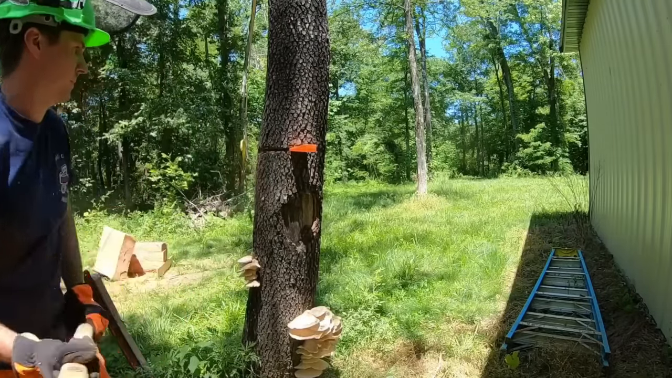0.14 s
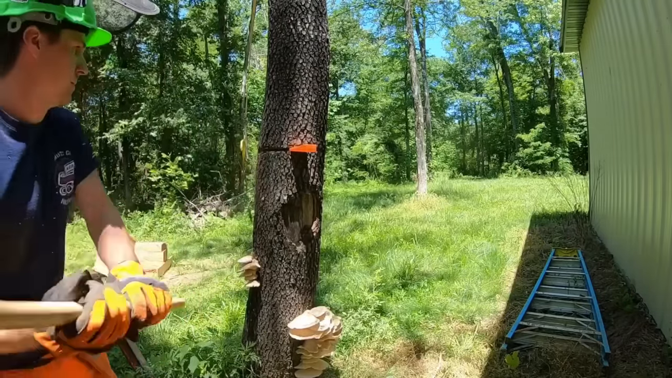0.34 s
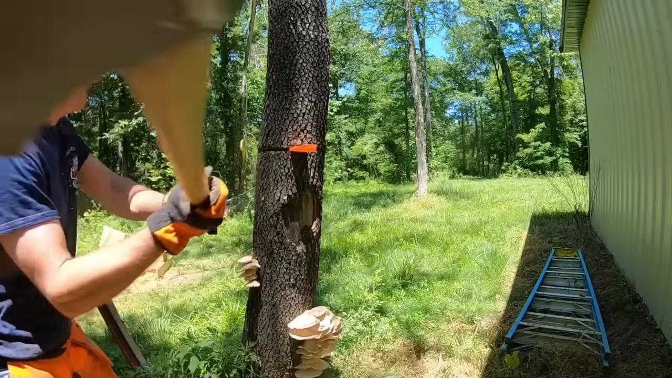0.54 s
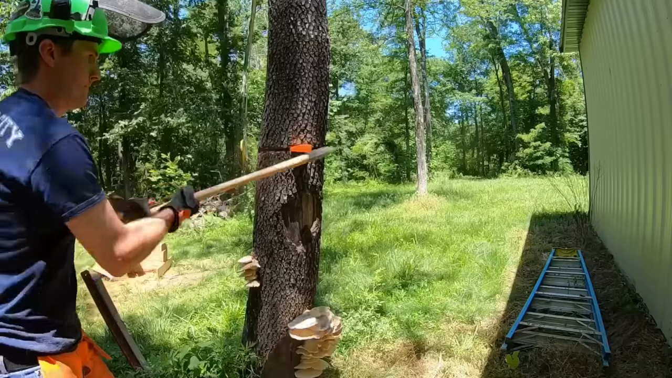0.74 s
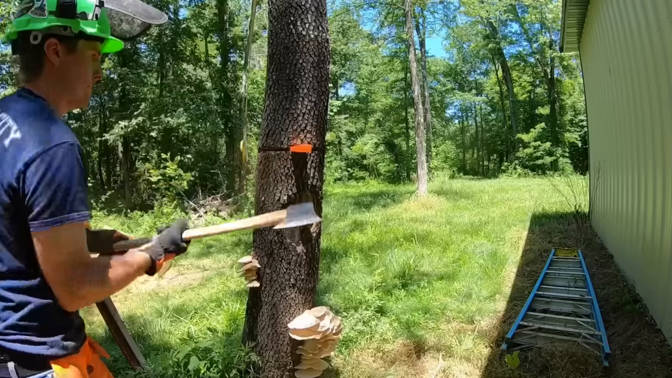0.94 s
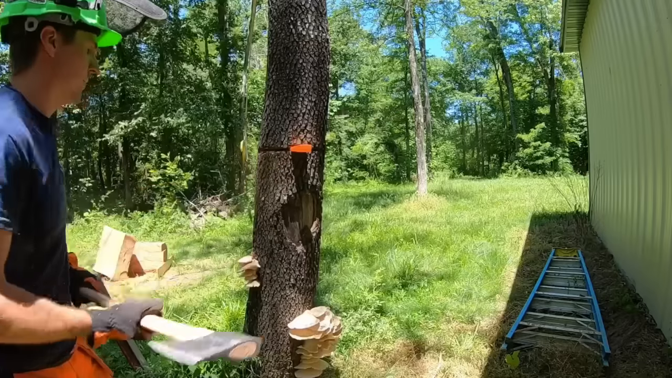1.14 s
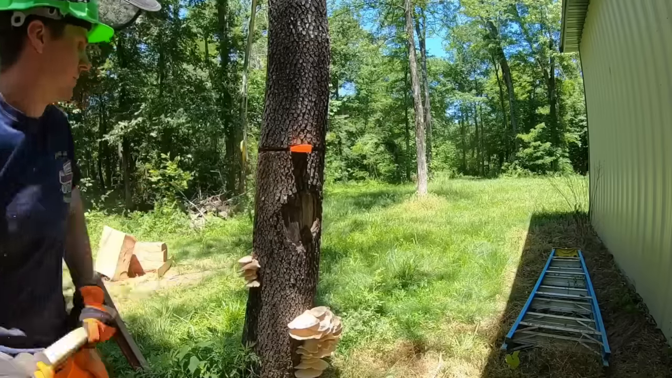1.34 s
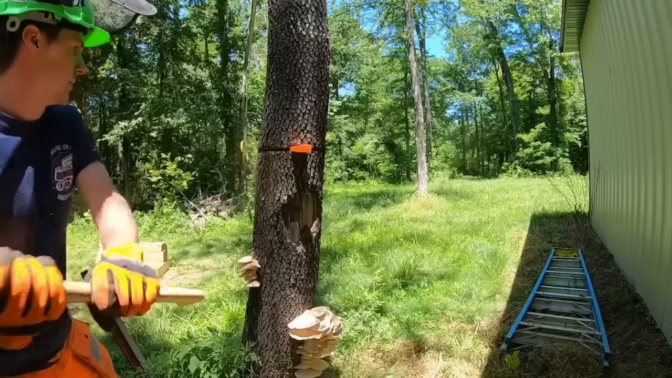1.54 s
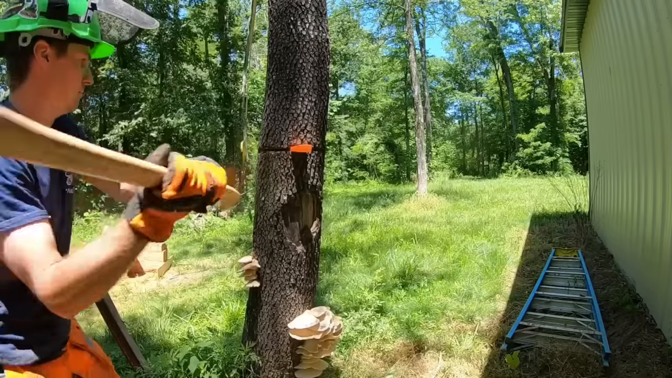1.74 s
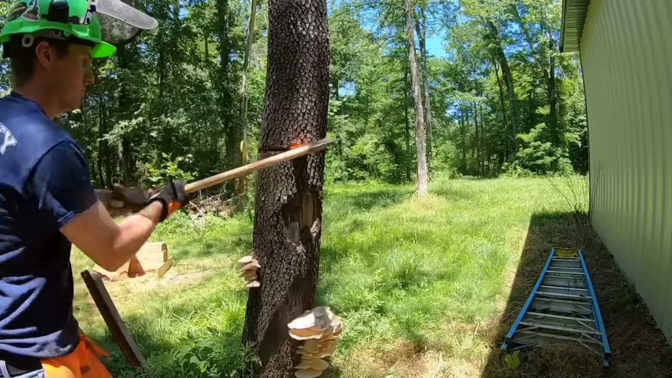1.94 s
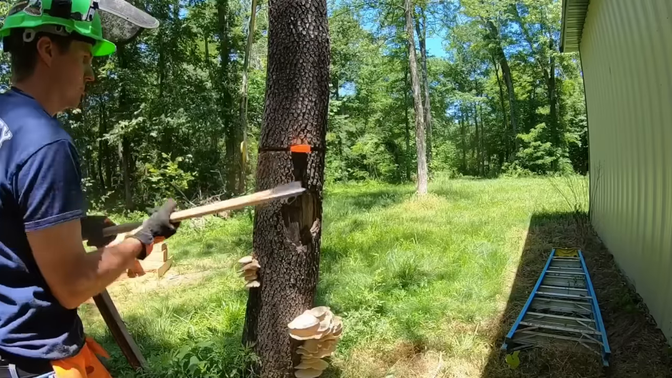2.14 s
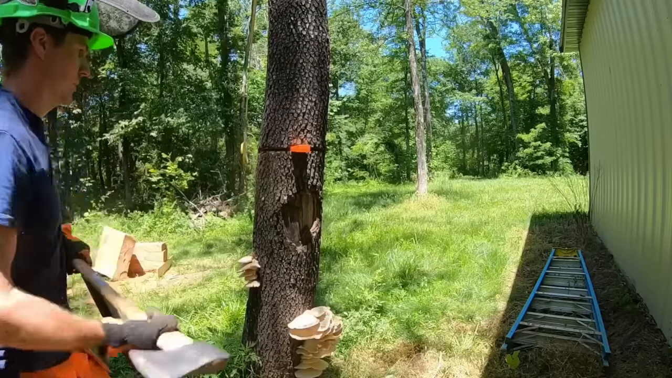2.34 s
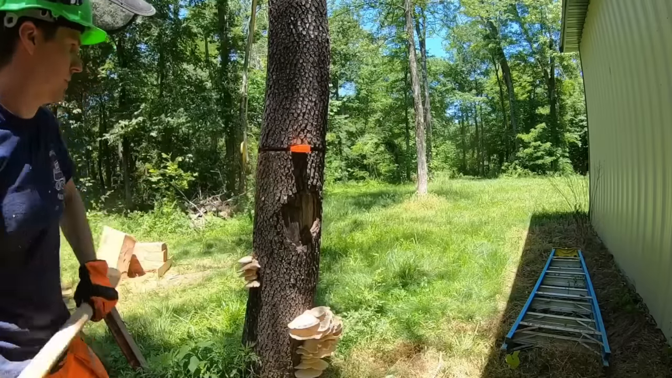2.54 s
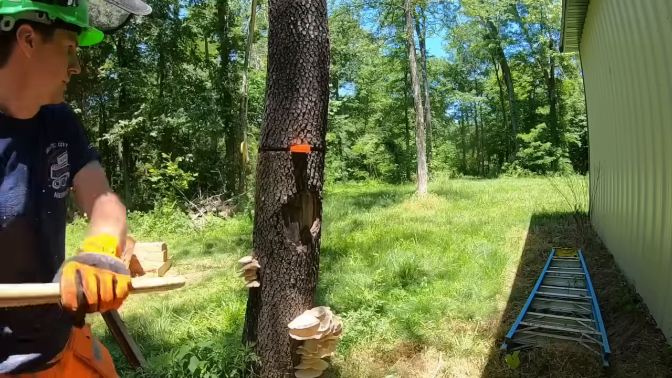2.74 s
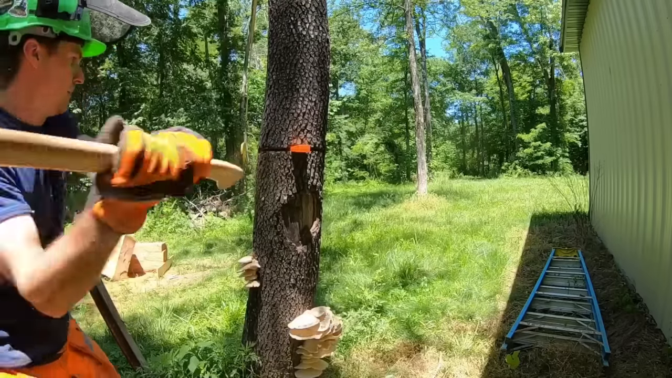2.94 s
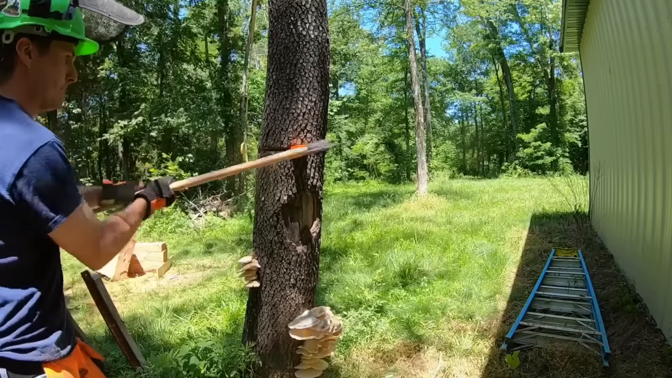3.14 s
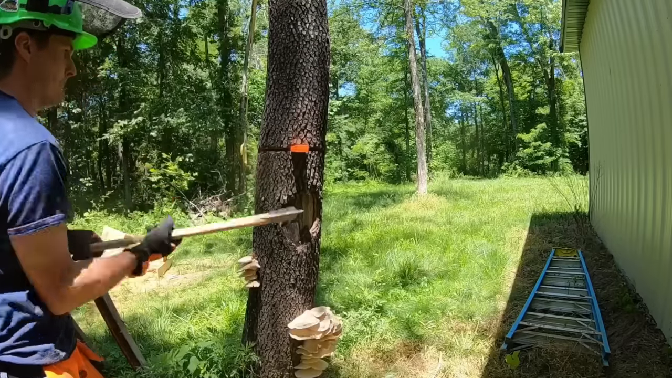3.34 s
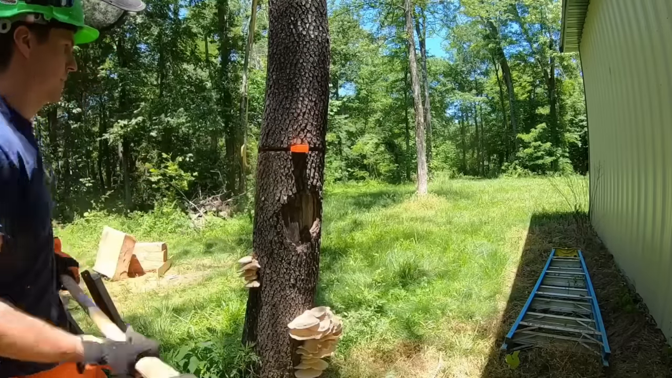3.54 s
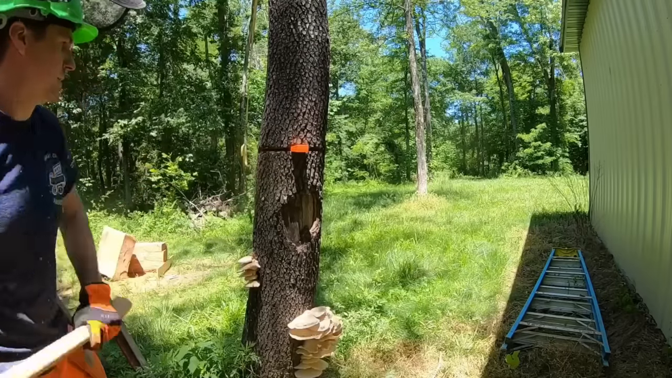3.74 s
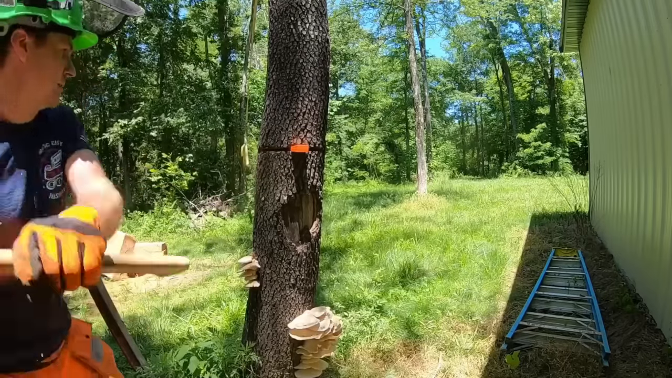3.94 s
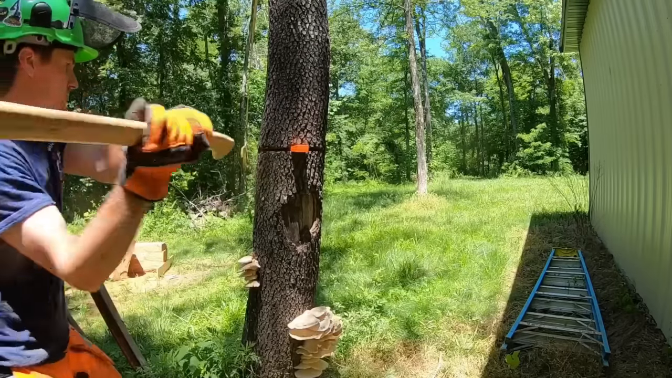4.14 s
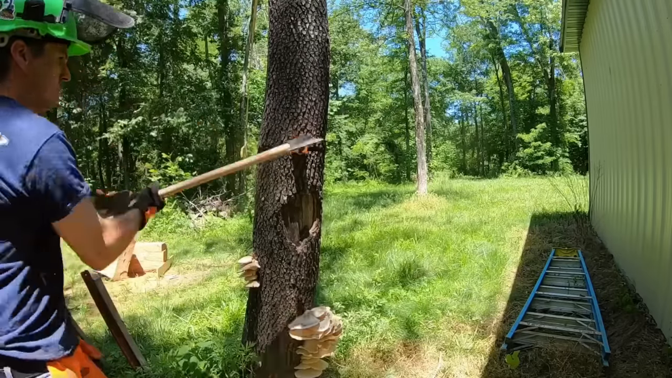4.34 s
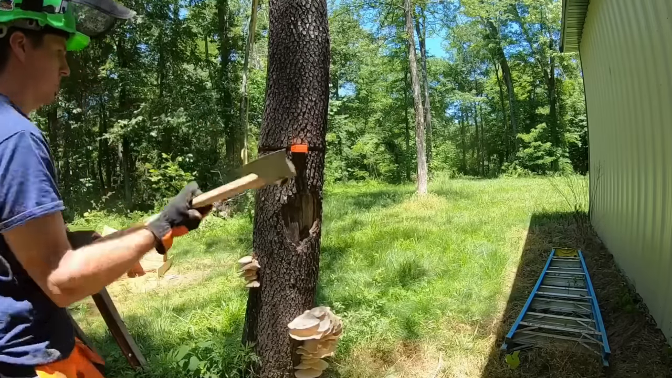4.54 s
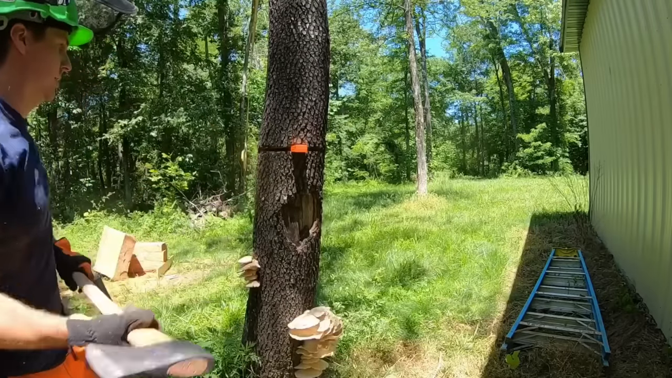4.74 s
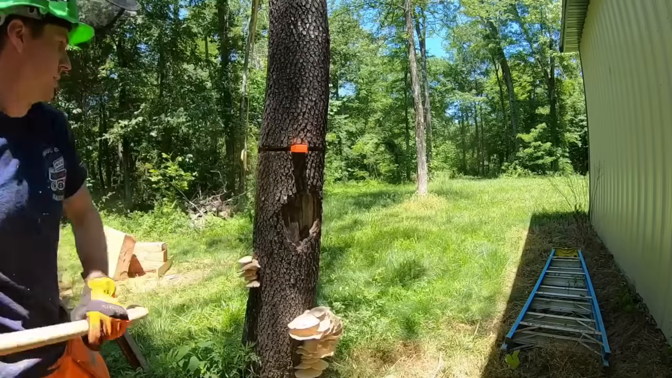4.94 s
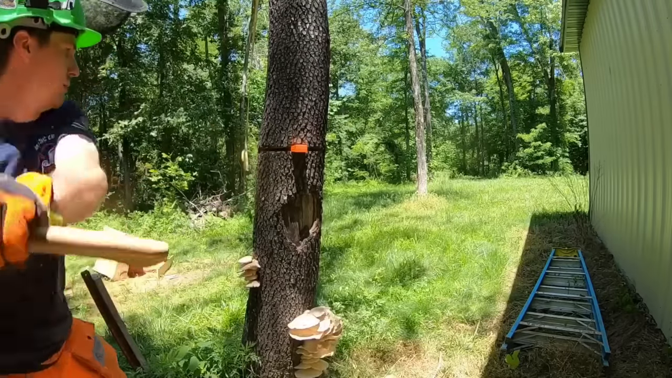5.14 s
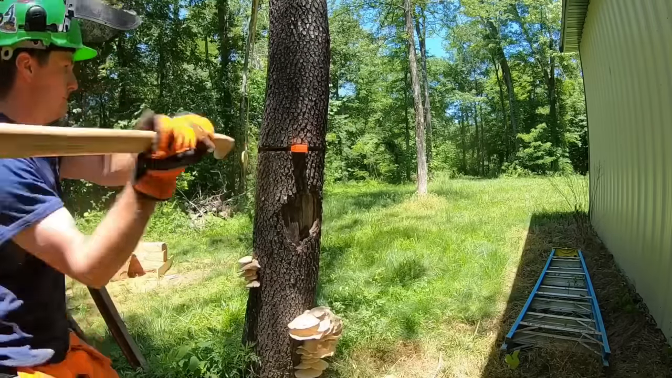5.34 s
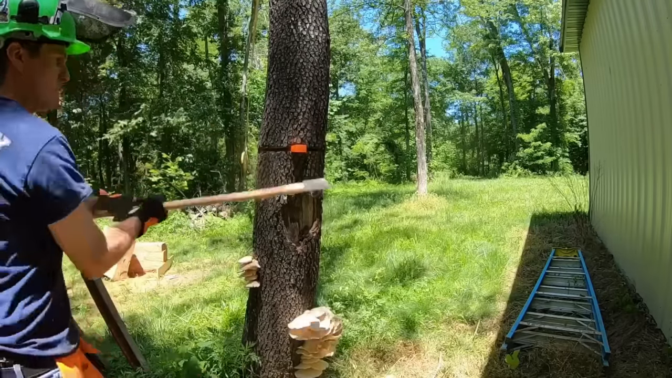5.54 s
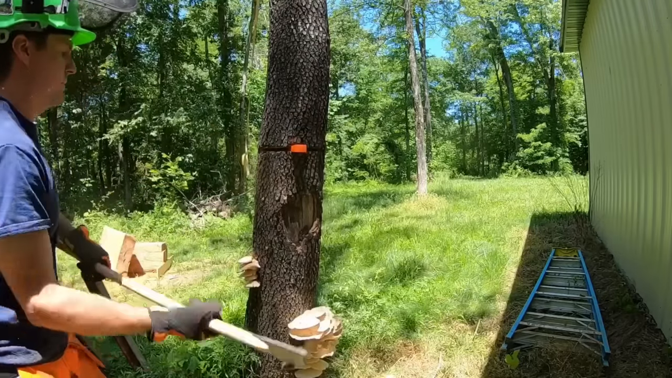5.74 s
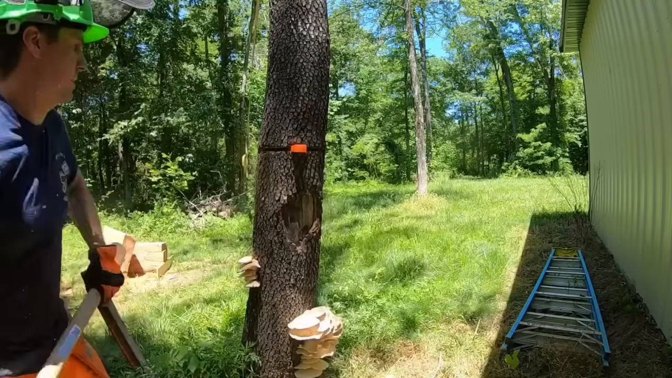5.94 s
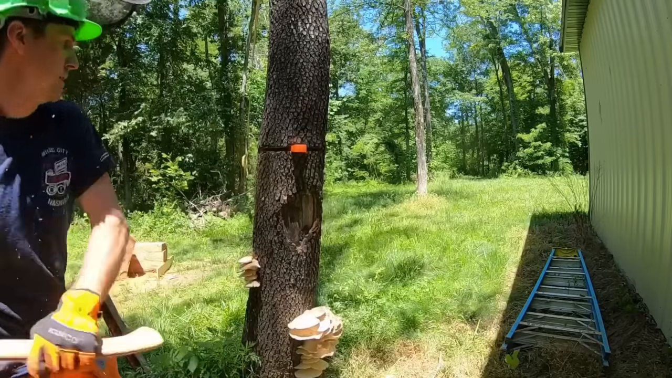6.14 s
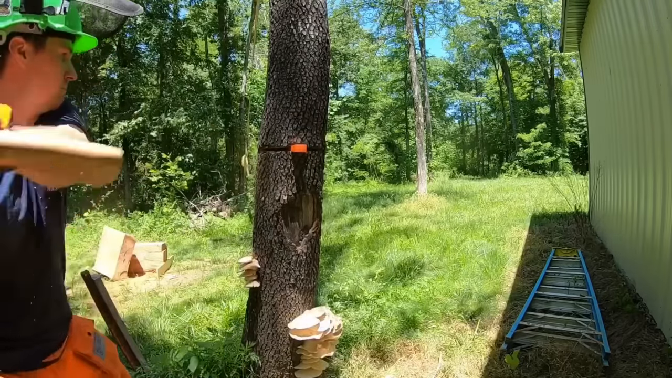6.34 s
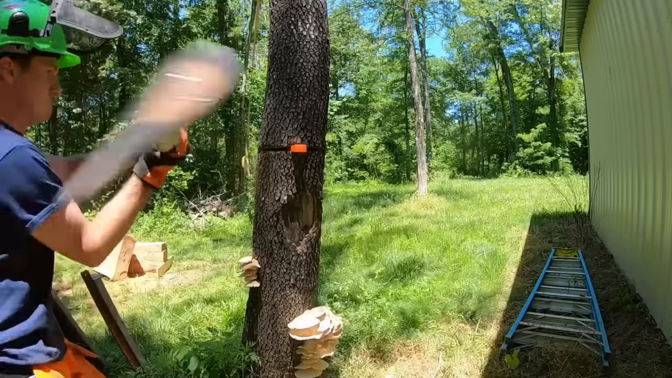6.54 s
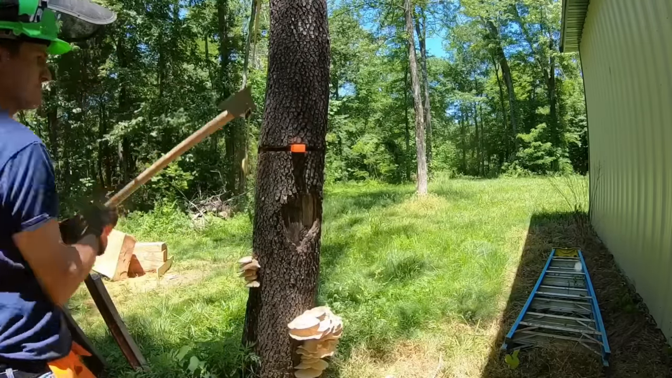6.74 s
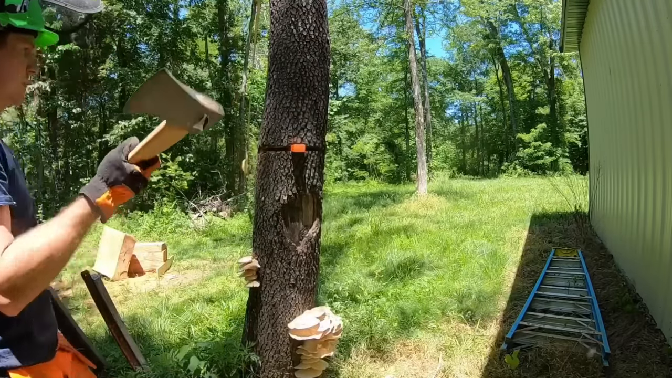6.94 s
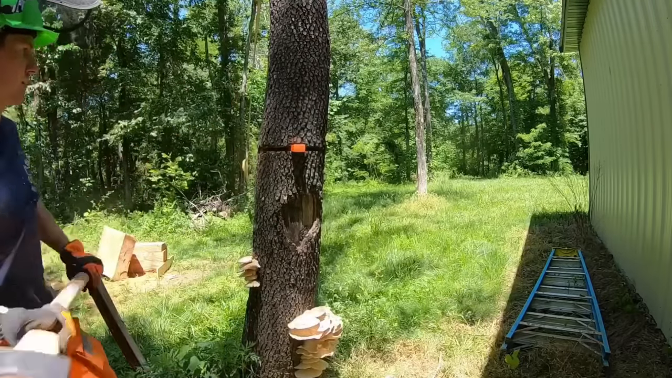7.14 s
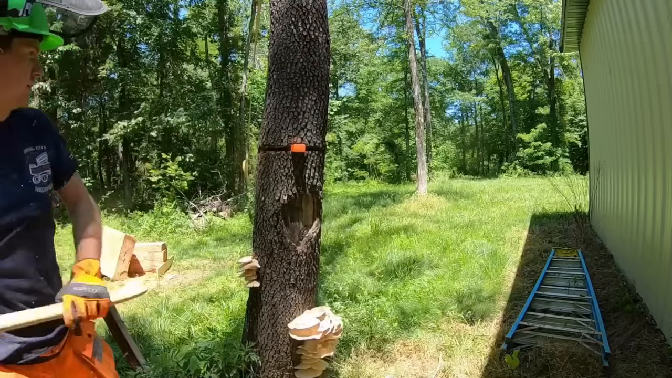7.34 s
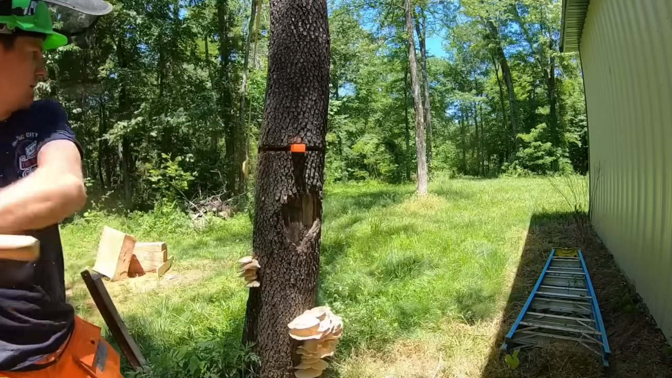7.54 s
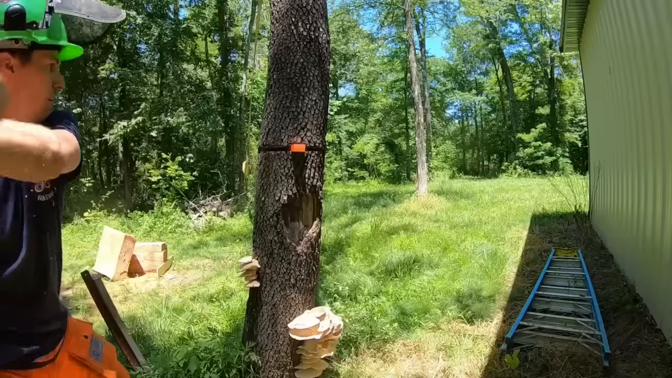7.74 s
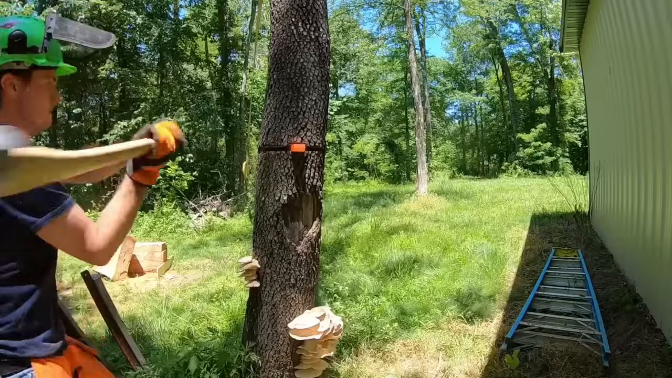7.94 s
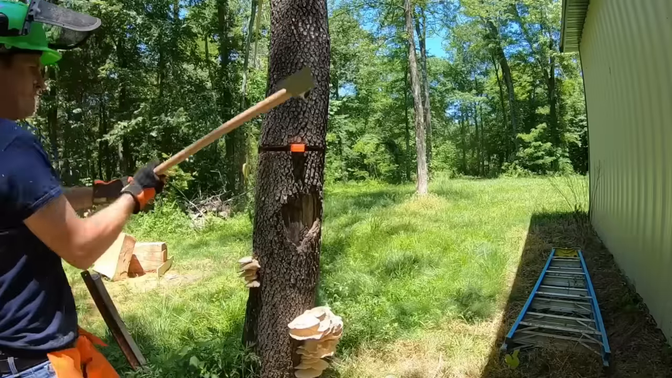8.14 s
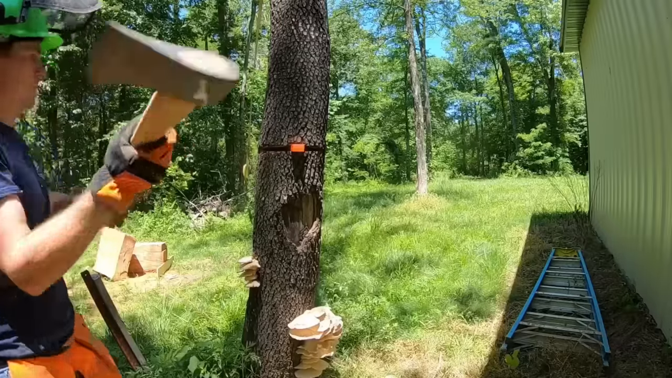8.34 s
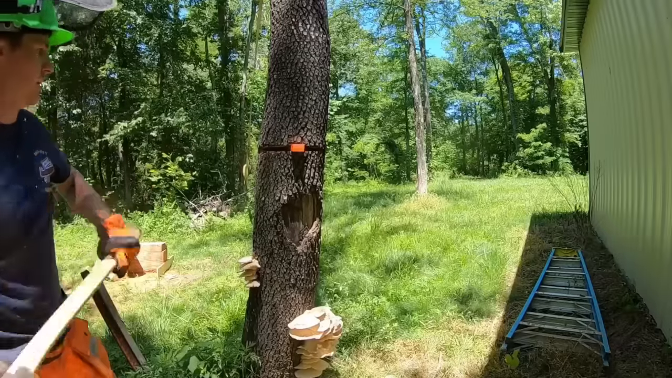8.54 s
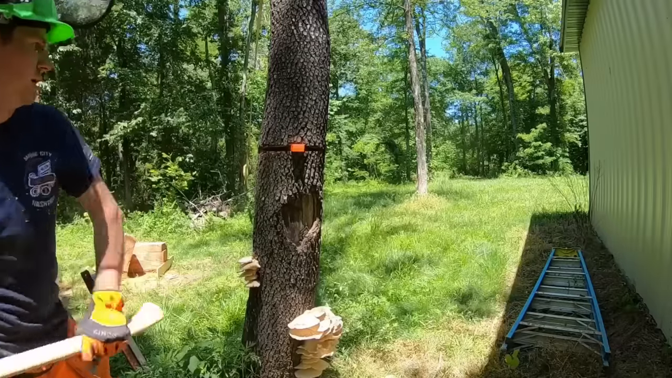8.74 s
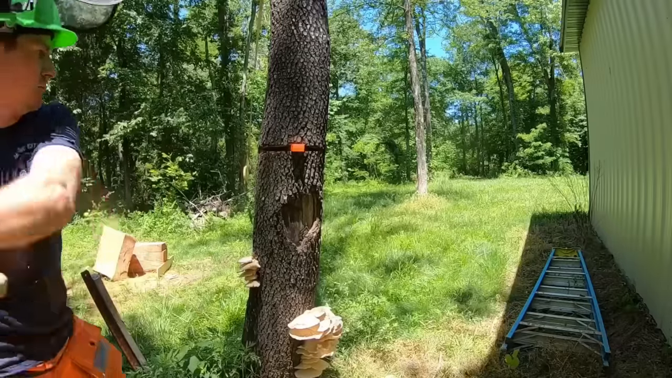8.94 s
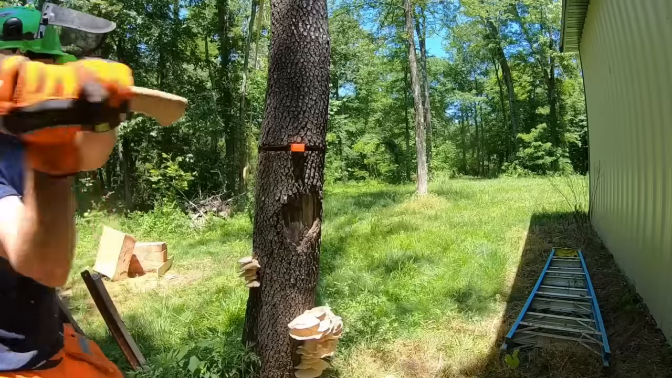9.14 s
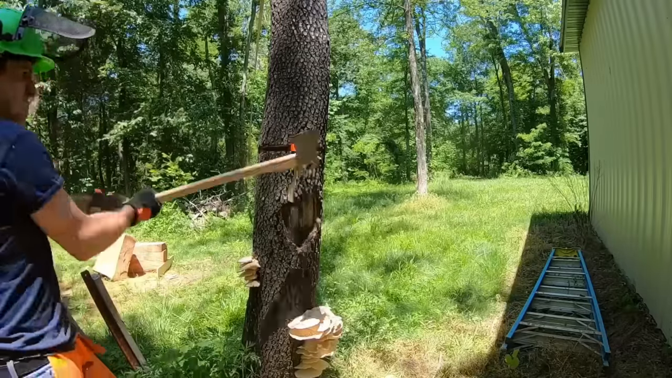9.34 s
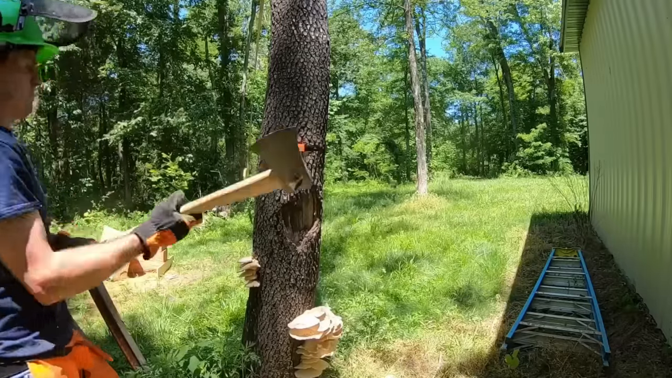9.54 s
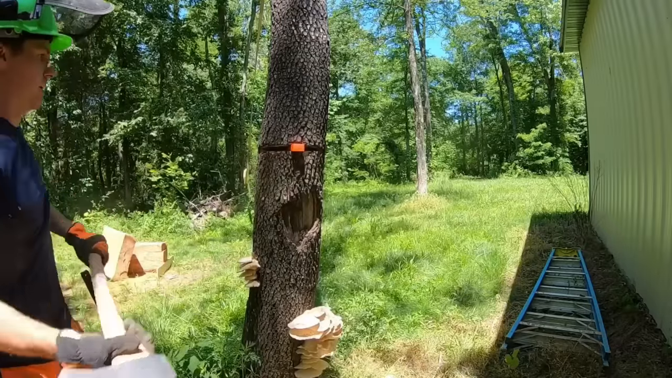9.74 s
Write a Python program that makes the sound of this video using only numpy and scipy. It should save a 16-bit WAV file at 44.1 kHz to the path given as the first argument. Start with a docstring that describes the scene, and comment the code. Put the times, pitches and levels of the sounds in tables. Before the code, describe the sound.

A quiet yard beside woods, heard close in stereo: very soft leaf hiss, a faint steady hum and a distant bird whistling falling three-note phrases near 0.1, 4.0 and 8.7 s. Eight loud axe-back blows hit a plastic wedge at about 0.75, 2.0, 3.2, 4.3, 5.5, 6.7, 8.1 and 9.3 s. Each is an abrupt, bright, millisecond crack with short plasticky ringing, a hollow knock, a low trunk boom bending upward and a rumbling shudder, then a diffuse forest echo swelling about 0.2 s later and fading. The second to fifth are brighter; the sixth is darker; the last two have heavier thuds. Between them are faint glove slides, sleeve rustles, air rushes, ticks and scrapes, with clearer slaps near 3.5 and 6.5 s, a stance-shifting rustle around 7.6 s, and scraping after 9.65 s.

```python
"""In a yard near a forest, the back of an axe drives a plastic wedge into a standing tree, eight blows.
Each blow cracks in the wedge (short ringing modes and a noise burst), booms through the trunk
(low modes, a rising sweep and rumble) and returns from the forest edge as a wash of coloured noise.
Between blows come handling sounds (slaps, knocks, scrapes and rustles of filtered noise) and ticks,
and a far bird whistles falling sine notes over soft leaf hiss and a faint hum."""
import sys
import numpy as np
from scipy import signal
from scipy.fft import rfft, irfft
from scipy.io import wavfile
from scipy.ndimage import uniform_filter1d

SR = 44100
rng = np.random.default_rng(int(sys.argv[2]) if len(sys.argv) > 2 else 0)


def put_to_file(sound):
    """Save the sound as 16-bit audio at rate SR, in the file named by the first command-line argument."""
    columns = np.atleast_2d(sound).T  # one column per channel
    safe = np.clip(columns, -1, 1)
    whole_steps = np.round(safe * 32767)
    wavfile.write(sys.argv[1], SR, whole_steps.astype(np.int16))


N = 432180
T = np.arange(int(1.2 * SR)) / SR  # time within one sound, in seconds

# All levels in the tables are relative.
# the axe blows: start_s, force_db, wedge_hz, wedge_db, second_ring_hz, second_ring_db,
# treble_db, boom_db, thud_db, glove_slide_db
BLOWS = [(0.7534, 0, 1697, 5, 3160, -4, -0.5, -5.5, 0.5, -53),
         (1.9773, -3, 2124, 1, 1844, 3, 5.5, -1.5, -4, -54),
         (3.1843, -1, 2383, 4.5, 1440, 1.5, 5, -0.5, 0, -55),
         (4.3357, -1.5, 2480, 0, 1434, 0, 4.5, -1, -3, -60.5),
         (5.509, -3.5, 2377, -1, 9580, -9.5, 6.5, -1.5, 1, -57),
         (6.6554, 0.5, 1004, -1, 1430, -1.5, -7, 1, 5.5, -56),
         (8.0695, -1.5, 2350, -2, 4010, -3, 1, 0.5, 7.5, -86),
         (9.348, -0.5, 1980, -19.5, 2910, 4, -6, -1, 13.5, -54)]
# ringing modes of wedge and axe head: pitch_hz, level_db, t60_s
WEDGE_MODES = [(1034, -16, 0.055), (1325, -16, 0.016), (1470, -8, 0.012), (1983, -10.5, 0.018),
               (2480, -14.5, 0.018), (3515, -12, 0.011), (4440, -20, 0.004), (5560, -15, 0.005),
               (6470, -10.5, 0.0063), (9150, -14.5, 0.0058)]
# ringing modes of the trunk: pitch_hz, level_db, t60_s
TRUNK_MODES = [(42.2, -38, 0.98), (47.7, -48.5, .5), (54, -48, 0.71), (84, -30.5, 0.35), (91, -45.5, 0.14),
               (116.7, -38.5, 0.29), (153.7, -36.5, 0.39), (241, -16.5, 0.051), (266, -20.5, 0.042),
               (343, -42.5, 0.39)]
# hollow knock of the cut opening: pitch_hz, level_db, t60_s
KNOCK_MODES = [(295, -23.5, .03), (521.5, -40, 0.11), (608, -43.5, .12)]
# colour of the noise burst in the crack: frequency_hz, level_db
SPLINTER_COLOUR = [(200, -26), (680, -15.5), (1400, 1.5), (2600, 7), (4300, 2.5), (6600, -1), (8000, -12),
                   (9600, -10.5), (11000, -25), (16000, -26)]
# colour of the hollow thud: frequency_hz, level_db
THUD_COLOUR = [(30, -15.5), (90, -8), (200, -5.5), (330, -2), (450, -7.5), (640, -17.5), (900, -17),
               (2000, -47.5), (5000, -83.5)]
# colour of the trunk's shudder: frequency_hz, level_db
RUMBLE_COLOUR = [(15, -35), (28, -15.5), (42, 6.5), (62, -6.5), (100, -2), (170, -10), (300, -23.5),
                 (500, -30.5), (1500, -78)]
# colour of the leaf hiss: frequency_hz, level_db
AIR_COLOUR = [(20, -19), (42, -3), (100, -4.5), (170, -4.5), (300, -8), (480, -11.5), (800, -10),
              (1600, -8.5), (2500, -6.5), (4000, -15), (9000, -18), (10500, -28.5), (13000, -38.5),
              (16000, -48)]
# colour of rubbing and ticking cloth: frequency_hz, level_db
CLOTH_COLOUR = [(150, -2.5), (600, -2.5), (2000, 4.5), (4000, 0), (9000, -2), (10500, -11.5), (15000, -13)]
# colour of the handling sounds: frequency_hz, level_db
HANDLING_COLOUR = [(60, -19), (250, -7.5), (480, -9.5), (1200, -4.5), (2500, -7), (4500, -9.5), (9000, -11),
                   (11000, -25), (16000, -35.5)]
# colour of the faint soft build-up before each crack: frequency_hz, level_db
LEAD_IN_COLOUR = [(40, -38), (150, -8.5), (450, 0), (650, -6), (950, 2.5), (1400, -14), (3200, -15.5),
                  (6000, -28.5), (12000, -41)]
# colour of sound scattered by bark and leaves: frequency_hz, level_db
FOLIAGE_COLOUR = [(100, 3), (500, -2.5), (1100, -1.5), (1500, -2), (2300, 2), (4000, -5.5), (7000, -2.5),
                  (9500, -2.5), (12000, -14.5), (16000, -7.5)]
# colour of the forest echo: frequency_hz, level_db
ECHO_COLOUR = [(100, -10.5), (500, -10), (800, -5), (1080, 2.5), (1300, -1.5), (2300, 1), (3200, -3),
               (4500, -7), (7000, -8.5), (9300, -13.5), (11000, -25), (16000, -34.5)]
# ground, trunk and shed wall: delay_s, left_gain, right_gain
REFLECTIONS = [(.0043, 0.096, .36), (.0076, 0.024, .12), (0.01, .07, .03)]
# handling sounds, that is slaps, knocks, scrapes and rustles:
# start_s, level_db, resonance_hz, grit_db, t60_s, left_over_right_db
HANDLING_SOUNDS = [(1.005, -44.5, 2060, 15, 0.092, 0.5), (1.296, -55, 1390, -2, 0.5, 1),
                   (1.426, -45.5, 2250, -20, 0.076, 1), (3.377, -40, 2450, 12, 0.12, 1),
                   (3.529, -29.5, 3700, 3, 0.07, -1.5), (3.982, -50.5, 1480, 3, 0.11, 2.5),
                   (4.855, -58, 7000, 10, 0.078, -8.5), (5.074, -53.5, 280, -25.5, 0.078, -11),
                   (5.191, -48, 1370, 15.5, 0.13, 1.5), (5.659, -37.5, 2290, -24.5, 0.26, -0.5),
                   (5.869, -45, 2880, 10.5, .14, 0.5), (5.998, -50, 2250, 9, .24, 1.5),
                   (6.108, -55, 1600, -8.5, 0.23, 0), (6.303, -45, 1830, -26, 0.045, 6),
                   (6.414, -36.5, 3000, -7.5, .13, -8.5), (6.42, -47.5, 790, -22.5, .2, -9),
                   (6.524, -26.5, 2660, 8.5, 0.046, -3), (7.094, -40.5, 1710, 3, 0.24, -1),
                   (7.357, -49.5, 2500, -1, 0.072, 1), (7.71, -44.5, 1400, -0.5, 0.018, -2),
                   (8.459, -49, 1387, 11, 0.09, -11), (8.704, -52, 5000, 0, 0.043, -6),
                   (8.999, -42.5, 1560, -4.5, 0.053, 8), (9.216, -48.5, 400, -17, 0.16, -2),
                   (9.258, -47, 720, -32, 0.16, -4), (9.658, -39, 2790, 5.5, 0.28, -7),
                   (9.785, -33.5, 1970, -6, 0.42, -6)]
# songs of the far bird: start_s, phrase_count, level_db
SONGS = [(0.061, 2, -58.5), (3.99, 4, -62.5), (8.65, 2, -62)]
# level difference of the two microphone ports: frequency_hz, left_over_right_db
PORT_BALANCE = [(60, -2), (200, -.2), (500, -.5), (1100, -0.1), (2000, 0.3), (4400, 0.4), (6600, -2.5),
                (9300, 3), (14000, 5)]
# phase difference of the two microphone ports: frequency_hz, left_lead_rad
PORT_PHASE = [(30, 0.031), (4200, 0.068), (6300, 0.93), (8000, 1), (16000, .7)]
# treble soaked up by leaves on the longer paths: frequency_hz, level_db
LEAF_LOSS = [(1800, -0.5), (3200, -6), (6000, -16.0), (12000, -26)]
# colour of the air around the swung axe: frequency_hz, level_db
WHOOSH_COLOUR = [(30, -6), (130, -12.5), (270, -0.5), (430, -10.5), (800, -9), (1200, -14.0), (6000, -38.5)]
# treble loss of the microphone: frequency_hz, level_db
MIC_COLOUR = [(9500, -1), (11000, -6.5), (16000, -9.5)]
# the faint far hum: time_s, level_db
HUM_LEVEL = [(0, -74.5), (2.4, -75.5), (4, -75.0), (9.8, -78.0)]

AIR_DB = -62
# each phrase steps down through three notes, each softer than the last
PHRASE_S, NOTE_GAP_S, NOTE_S = .446, .092, 0.169
TOP_NOTE_HZ, NOTE_STEP, NOTE_FADE_DB = 3210, .84, -3
FIRST_PHRASE_SOFTER_DB = 2.5
# small ticks of handling, thickest while the axe is gathered up after a blow
GATHER_S, GATHER_WIDTH_S = .62, 0.29
TICKS_PER_S, GATHER_TICKS_PER_S, SHIFT_TICKS_PER_S = 1.1, 8.2, 19
# every swing: the glove slides up the handle, then sleeves rustle and air rushes as the axe comes round
SLIDE_LEAD_S, SLIDE_RISE_S, SLIDE_STOP_S = 0.361, 0.11, 0.024
SWING_LEAD_S, SWING_WIDTH_S, SLEEVE_DB, WHOOSH_DB = .085, 0.11, -62, -65.5
SLEEVE_PER_THUD = .6  # dB of sleeve rustle per dB of thud: a harder swing is louder all through
# one longer pause to shift stance
SHIFT_S, SHIFT_WIDTH_S, SHIFT_DB = 7.58, 0.33, -58.5
# the bending wave in the trunk: its low part arrives first, so the pitch climbs to a top
BEND_START_HZ, BEND_CLIMB_HZ_PER_S, BEND_TOP_HZ = 86, 2100, 173
BEND_DB, BEND_PEAK_S, BEND_RISE_S, BEND_FALL_S = -22, 0.013, 0.0098, 0.037
# as the trunk rings on, its sound spreads around the listener
SPREAD, SPREAD_S = 1.3, .07
KNOCK_PER_THUD = 0.95  # dB of knock per dB of thud
# the echo: nearby trees answer at once, the forest edge swells up later, the deep woods linger
NEAR_DB, NEAR_T60_S = -51.5, .7
EDGE_DB, EDGE_DELAY_S, EDGE_SPREAD_S = -49.5, 0.21, 0.13
DEEP_DB, DEEP_T60_S = -65.5, 2.6
MIC_CUTOFF_HZ, PEAK_CEILING = 16100, .6


def amp(db):
    """Decibels to gain."""
    return 10 ** (np.asarray(db) / 20)


def unit(x):
    """Scales to rms 1."""
    return x / np.sqrt(np.mean(x ** 2) + 1e-20)


def add(mix, s, sound):
    """Mixes a sound in at time s."""
    part = mix[:, max(round(s * SR), 0):][:, :sound.shape[-1]]
    part += sound[..., :part.shape[1]]


def colour(x, spectrum):
    """Filters by a table of frequency and level, smooth along a log frequency scale."""
    hz, db = np.transpose(spectrum)
    f = np.fft.rfftfreq(x.shape[-1], 1 / SR)
    gain = amp(np.interp(np.log(f + 1), np.log(hz + 1), db))
    return irfft(rfft(x) * gain, x.shape[-1])


def noise(spectrum, side, size=len(T)):
    """Coloured stereo noise of rms 1; side is the part that differs between the ears."""
    mid, apart = rng.standard_normal((2, size))
    stereo = np.array([mid + side * apart, mid - side * apart])
    return unit(colour(stereo, spectrum))


def brighten(x, treble_db):
    """Treble shelf."""
    treble = signal.lfilter(*signal.butter(1, 4500, "high", fs=SR), x)
    return x + (amp(treble_db) - 1) * treble


def swell(s, rise, fall, size=N):
    """A smooth hump that peaks at time s."""
    t = np.arange(size) / SR - s
    return np.exp(-(t / np.where(t < 0, rise, fall)) ** 2)


def grain(depth_db, size):
    """Uneven stick and slip of rubbing."""
    roughness = unit(uniform_filter1d(rng.standard_normal(size), 60))
    return unit(amp(depth_db * roughness))


def ring(modes):
    """Damped modes set off by one push."""
    return -sum(amp(db - 60 * T / t60) * np.sin(2 * np.pi * hz * T) for hz, db, t60 in modes)


def outdoors():
    """Soft leaf hiss that swells slowly, and a faint far hum that wavers with it."""
    t = np.arange(N) / SR
    rates_hz = np.geomspace(.2, 5, 20)
    drift = unit(sum(np.sin(2 * np.pi * (f * t + rng.random())) / np.sqrt(f) for f in rates_hz))
    hum_s, hum_db = np.transpose(HUM_LEVEL)
    hum = np.sin(2 * np.pi * np.cumsum(328 + 0.85 * drift) / SR) * amp(np.interp(t, hum_s, hum_db))
    hiss = noise(AIR_COLOUR, side=0.78, size=N) * amp(AIR_DB + 0.27 * drift)
    return hiss + hum


def note(hz, fall, length):
    """One whistled note that sags in pitch and quavers."""
    t = T[T < length]
    quaver = .028 * unit(uniform_filter1d(rng.standard_normal(len(t)), 120))
    pitch_hz = hz * (1 - fall * t / length + quaver)
    return np.sin(2 * np.pi * np.cumsum(pitch_hz) / SR) * signal.windows.tukey(len(t), .4)


def bird():
    """Phrases of three falling notes, repeated at an even pace and smeared by the woods."""
    out = np.zeros((2, N))
    for start, count, db in SONGS:
        for phrase in range(int(count)):
            phrase_db = db - FIRST_PHRASE_SOFTER_DB * (phrase == 0)
            for k in range(3):
                whistle = note(hz=TOP_NOTE_HZ * NOTE_STEP ** k, fall=.02 + 0.023 * k, length=NOTE_S)
                note_start = start + phrase * PHRASE_S + k * NOTE_GAP_S
                add(out, note_start, amp(phrase_db + NOTE_FADE_DB * k ** 2) * whistle)
    add(out, 2.82, amp(-69.0) * note(hz=3900, fall=.01, length=.2))  # a second bird answers once
    woods = noise(FOLIAGE_COLOUR, side=0.42) * amp(-60 * T / 1.0)
    woods = woods / np.linalg.norm(woods[0])
    return amp(4.5) * signal.fftconvolve(out, woods, axes=1)[:, :N]


def creases():
    """Random ticks of clothing and dry grass, thicker as the axe is gathered up and the stance shifts."""
    gather = sum(swell(s + GATHER_S, GATHER_WIDTH_S, GATHER_WIDTH_S) for s, *_ in BLOWS)
    shift = swell(SHIFT_S, rise=.9, fall=.4)
    rate = TICKS_PER_S + GATHER_TICKS_PER_S * gather + SHIFT_TICKS_PER_S * shift
    ticks = (rng.random(N) < rate / SR) * rng.uniform(0.41, 1, N)
    fade = signal.lfilter([1], [1, -np.exp(-1 / (0.0078 * SR))], ticks)  # each tick dies away
    return amp(-52.5) * fade * noise(CLOTH_COLOUR, side=.5, size=N)


def swings():
    """Before each blow a glove hisses along the handle; then sleeves and air rush, more for a harder swing."""
    rub = amp(SHIFT_DB) * swell(SHIFT_S, SHIFT_WIDTH_S, SHIFT_WIDTH_S)
    whoosh = 0
    for s, *_, thud_db, slide_db in BLOWS:
        speed = swell(s - SWING_LEAD_S, SWING_WIDTH_S, SWING_WIDTH_S)
        slide = swell(s - SLIDE_LEAD_S, SLIDE_RISE_S, SLIDE_STOP_S)
        sleeve = amp(SLEEVE_DB + SLEEVE_PER_THUD * thud_db) * speed
        rub = rub + amp(slide_db) * slide + sleeve
        whoosh = whoosh + amp(WHOOSH_DB + thud_db) * speed
    cloth = noise(CLOTH_COLOUR, side=0.91, size=N) * grain(depth_db=2, size=N)
    air = noise(WHOOSH_COLOUR, side=0.49, size=N)
    return rub * cloth + whoosh * air


def crack(rings, treble_db):
    """Steel meets plastic: the wedge grinds a step deeper, and the spot struck picks two extra rings."""
    modes = amp(-3.0) * ring(WEDGE_MODES) + ring([(hz, db - 11.5, .018) for hz, db in rings])
    contact = amp(-7.5) * np.exp(-(T / .0018) ** 2) + amp(-24.5 - 60 * T / 0.0048)
    small = signal.butter(2, 800, "high", fs=SR)  # so small a part radiates little below its lowest mode
    splinter = noise(SPLINTER_COLOUR, side=0.2) * contact
    return brighten(signal.lfilter(*small, modes) + splinter, treble_db)


def yard(sound):
    """Direct sound, a few close reflections and scatter from bark and leaves."""
    out = sound.copy()
    for delay, left, right in REFLECTIONS:
        add(out, delay, sound * np.array([[left], [right]]))
    fade = amp(-36.5 - 60 * T / 0.08) * (1 - np.exp(-T / 0.0044))
    scatter = noise(FOLIAGE_COLOUR, side=0.97) * fade
    return out + signal.fftconvolve(sound, scatter, axes=1)[:, :len(T)]


def forest(wedge_hz, wedge_db, treble_db):
    """Countless trunks return the crack as a smooth wash; leaves soak up the treble on the longer paths."""
    wash = brighten(noise(ECHO_COLOUR, side=0.66), treble_db * 0.3)
    focus = signal.iirpeak(wedge_hz, 3.5, fs=SR)
    wedge_tone = signal.lfilter(*focus, signal.lfilter(*focus, wash))
    wash = wash + amp(wedge_db - 1.5) * wedge_tone
    dull = colour(wash, LEAF_LOSS)
    bright = np.exp(-(T / 0.29) ** 2)
    near = amp(NEAR_DB - 60 * T / NEAR_T60_S)
    edge = amp(EDGE_DB) * swell(EDGE_DELAY_S, EDGE_SPREAD_S, EDGE_SPREAD_S, size=len(T))
    deep = amp(DEEP_DB - 60 * T / DEEP_T60_S)
    return (dull + bright * (wash - dull)) * (near + edge + deep)


def boom():
    """The trunk's modes and the upward sweep of its bending wave."""
    bend_hz = np.minimum(BEND_START_HZ + BEND_CLIMB_HZ_PER_S * T, BEND_TOP_HZ)
    bend_level = amp(BEND_DB) * swell(BEND_PEAK_S, BEND_RISE_S, BEND_FALL_S, size=len(T))
    wave = -bend_level * np.sin(2 * np.pi * np.cumsum(bend_hz) / SR)
    modes = np.interp(T - .002, T, ring(TRUNK_MODES), left=0)  # the trunk answers once the wedge has moved
    width = SPREAD * (1 - np.exp(-(T / SPREAD_S) ** 2)) * (1 - T / T[-1])
    apart = signal.hilbert(modes).imag * width  # a quarter turn out of phase, opposite in each ear
    return (modes + wave + np.array([apart, -apart])) * (1 - np.exp(-T / 0.0017))


def blows():
    """A faint soft build-up before each crack; then the wedge cracks, the tree booms and shudders."""
    out, trunk = np.zeros((2, N)), boom()
    lead_s = T[:SR // 16]
    for s, force_db, wedge_hz, wedge_db, second_hz, second_db, treble_db, boom_db, thud_db, _ in BLOWS:
        hit = amp(force_db) * crack([(wedge_hz, wedge_db), (second_hz, second_db)], treble_db)
        sway = amp(-34.0) * np.exp(-(T / 0.12) ** 2) + amp(-39.5 - 60 * T / 1.33)
        shudder = noise(RUMBLE_COLOUR, side=0.9) * sway * (1 - np.exp(-T / 0.036))
        thud_fade = amp(-30 - 60 * T / 0.1) + amp(-48.0 - 60 * T / 0.69)
        thud = noise(THUD_COLOUR, side=0.13) * thud_fade
        lead_in_fade = amp(-32) * np.exp(-(lead_s / 0.014) ** 2)
        lead_in = noise(LEAD_IN_COLOUR, side=0.14, size=len(lead_s)) * lead_in_fade
        add(out, s - lead_s[-1], lead_in[:, ::-1])  # reversed: it grows up to the crack
        add(out, s, yard(hit) + forest(wedge_hz, wedge_db, treble_db))
        add(out, s + .002, amp(KNOCK_PER_THUD * thud_db) * ring(KNOCK_MODES))
        add(out, s, amp(boom_db) * (trunk + shudder) + amp(thud_db) * thud)
    return out


def handling():
    """Handling sounds (slaps, knocks, scrapes and rustles): a resonant body mixed with gritty rubbing."""
    out = np.zeros((2, N))
    for s, db, hz, grit_db, t60, pan_db in HANDLING_SOUNDS:
        rub = noise(HANDLING_COLOUR, side=0.21) * grain(depth_db=3.0, size=len(T))
        broad = signal.lfilter(*signal.iirpeak(hz, .8, fs=SR), rub)
        body = unit(signal.lfilter(*signal.iirpeak(hz, 1.4, fs=SR), broad))
        contact = unit(body + amp(grit_db + 3) * rub)
        fade = (amp(-60 * T / t60) + amp(-35 - 60 * T / 2.0)) * (1 - np.exp(-T / 0.0012))
        pan = amp([[pan_db / 2], [-pan_db / 2]])
        add(out, s, amp(db + 2.5) * contact * fade * pan)
    return out


def ports(x):
    """The two microphone ports hear each band with slightly different level and phase."""
    f = np.log(np.fft.rfftfreq(N, 1 / SR) + 1)
    balance_hz, balance_db = np.transpose(PORT_BALANCE)
    phase_hz, phase_rad = np.transpose(PORT_PHASE)
    db = np.interp(f, np.log(balance_hz + 1), balance_db)
    lead = np.interp(f, np.log(phase_hz + 1), phase_rad)
    left = amp(db / 2) * np.exp(1j * lead / 2)
    return irfft(rfft(x) * np.array([left, 1 / left]), N)


def scene():
    """Everything that sounds in the yard."""
    return outdoors() + bird() + creases() + swings() + blows() + handling()


def record(dry):
    """Two ports pick up the yard; loud peaks are rounded off; the deepest bass and the top are lost."""
    heard = ports(dry)
    rounded = heard / (1 + (heard / PEAK_CEILING) ** 4) ** (1 / 4)
    no_bass = signal.lfilter(*signal.butter(3, 26, "high", fs=SR), rounded)
    dulled = colour(no_bass, MIC_COLOUR)
    lowpass = signal.firwin(255, MIC_CUTOFF_HZ, window=("kaiser", 9), fs=SR)
    return signal.oaconvolve(dulled, lowpass[None], "same")


dry = scene()
out = record(dry)
put_to_file(out)
```